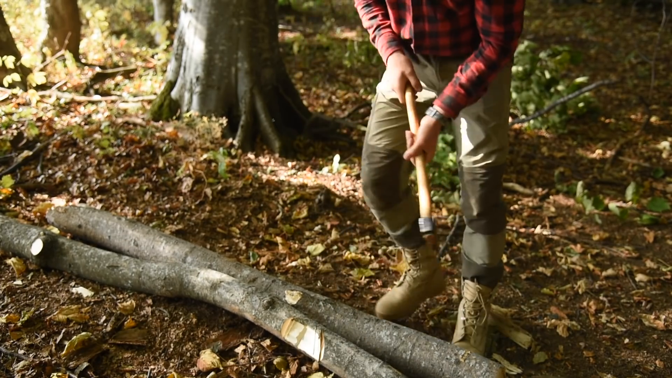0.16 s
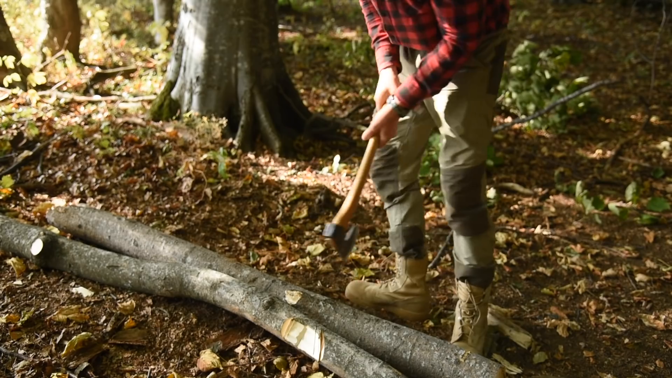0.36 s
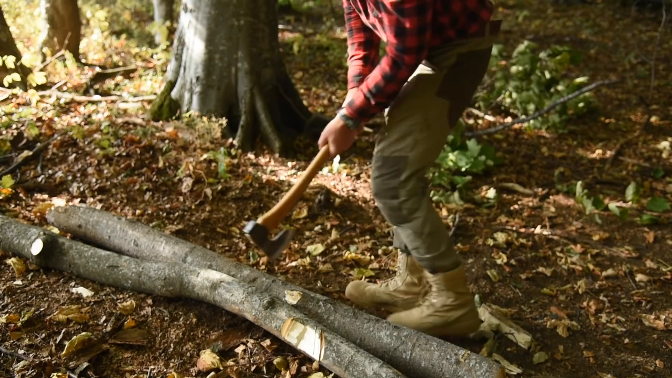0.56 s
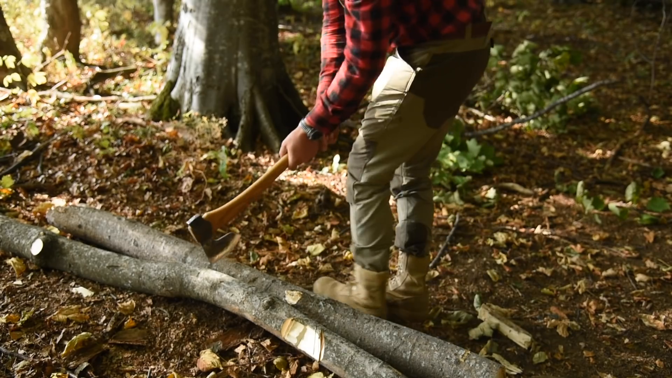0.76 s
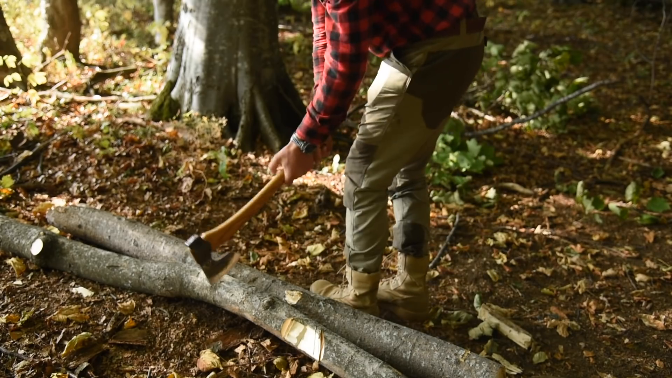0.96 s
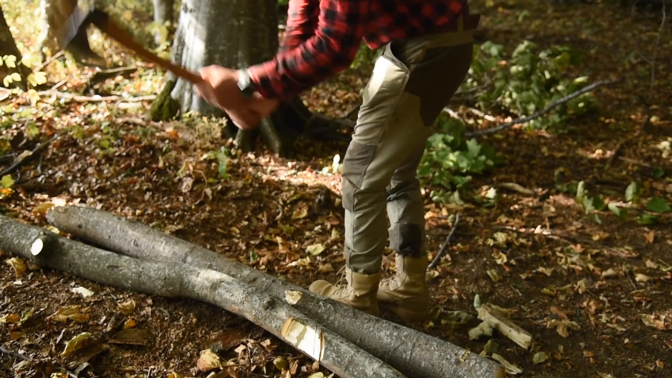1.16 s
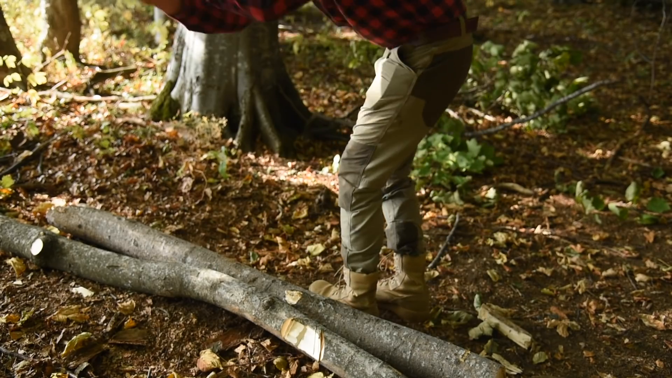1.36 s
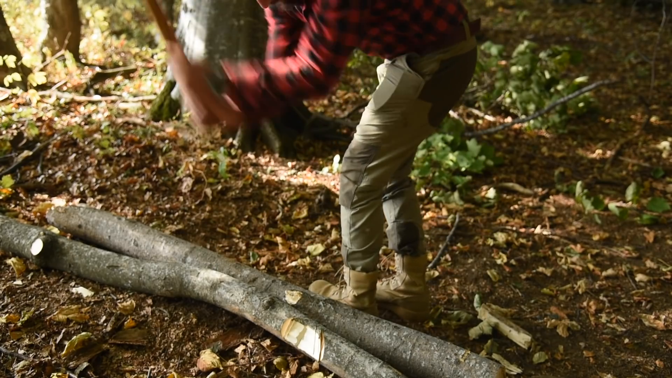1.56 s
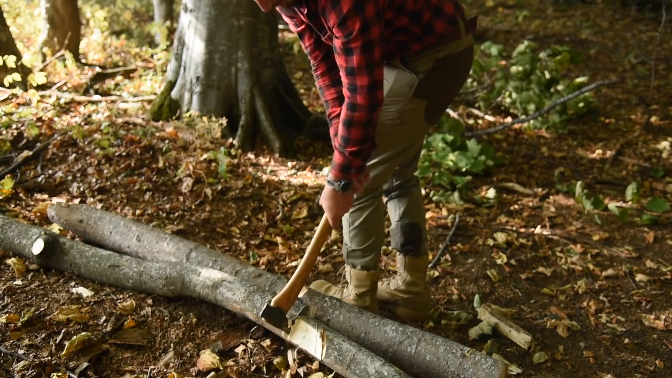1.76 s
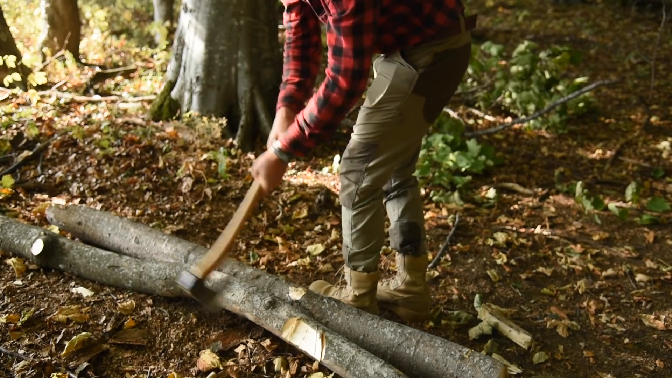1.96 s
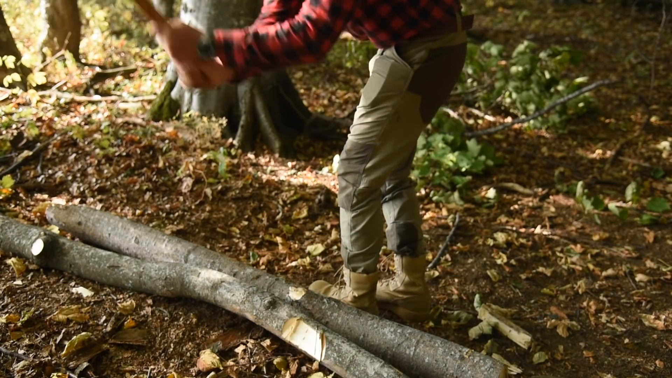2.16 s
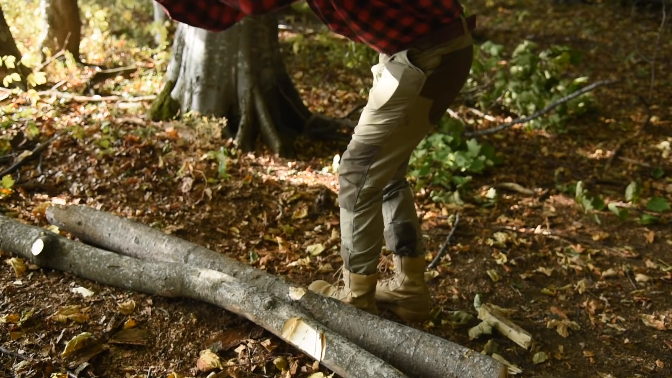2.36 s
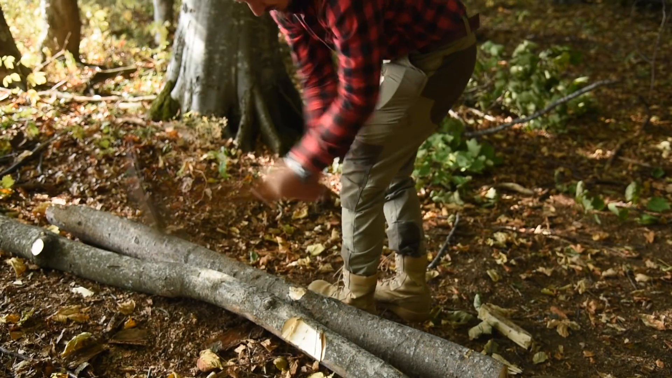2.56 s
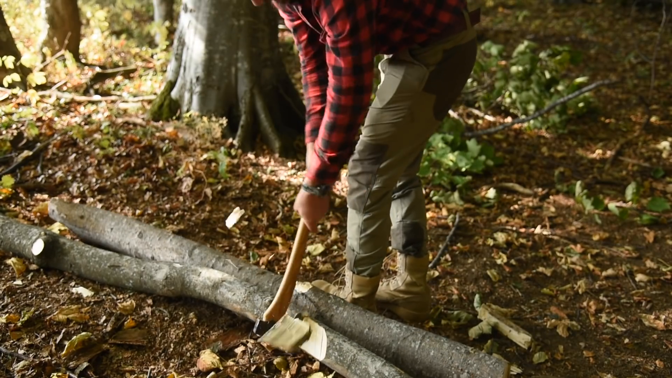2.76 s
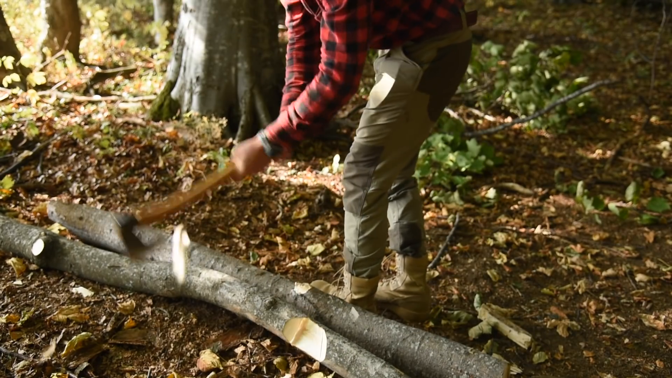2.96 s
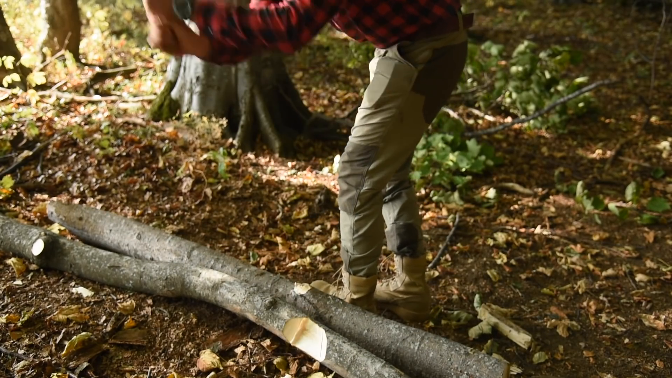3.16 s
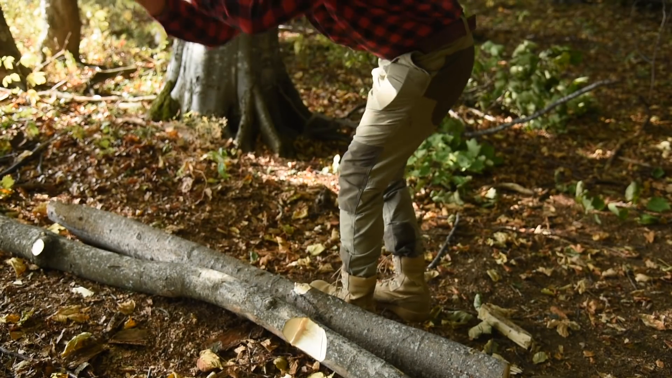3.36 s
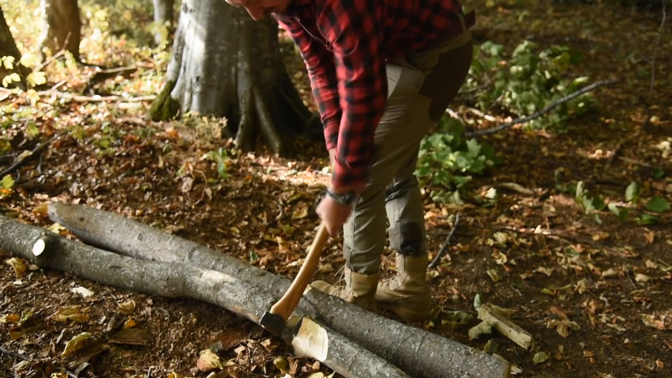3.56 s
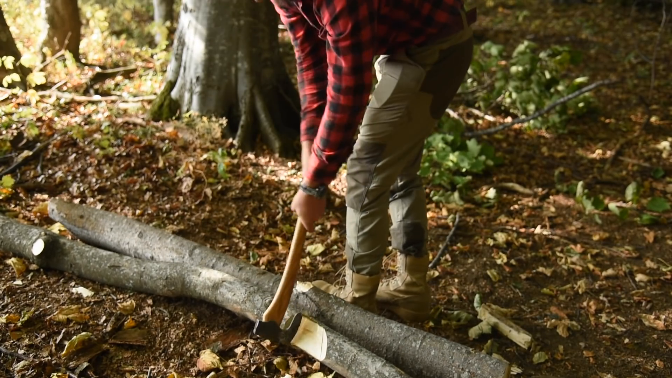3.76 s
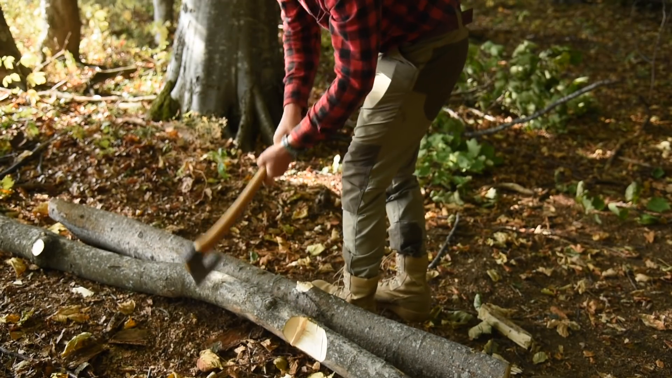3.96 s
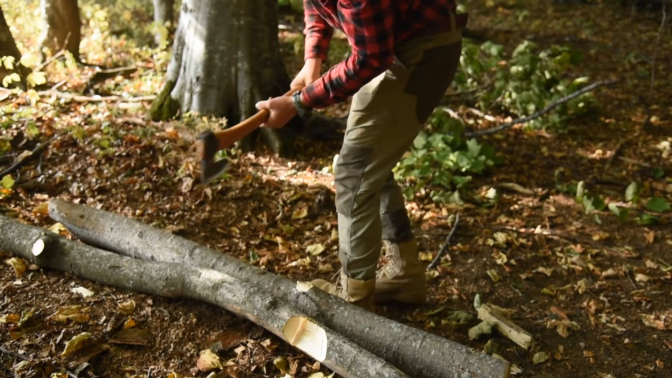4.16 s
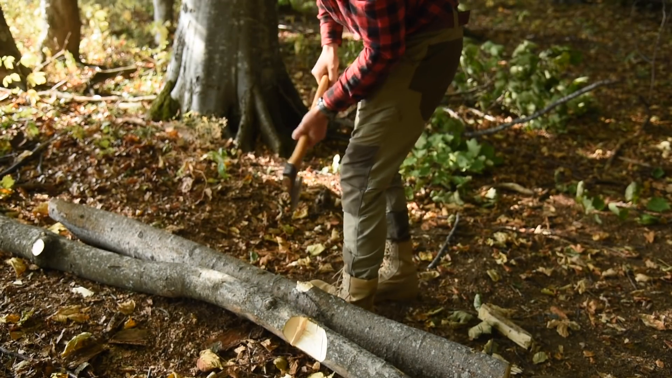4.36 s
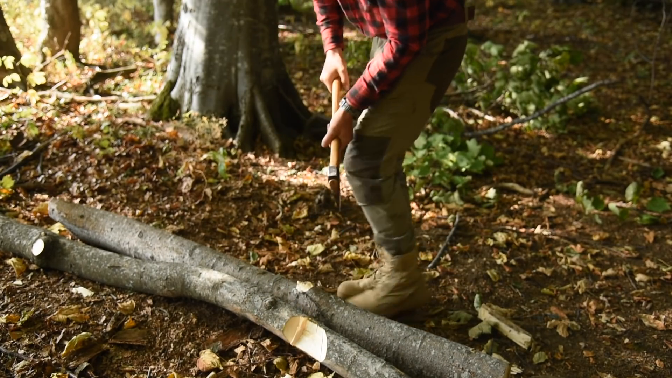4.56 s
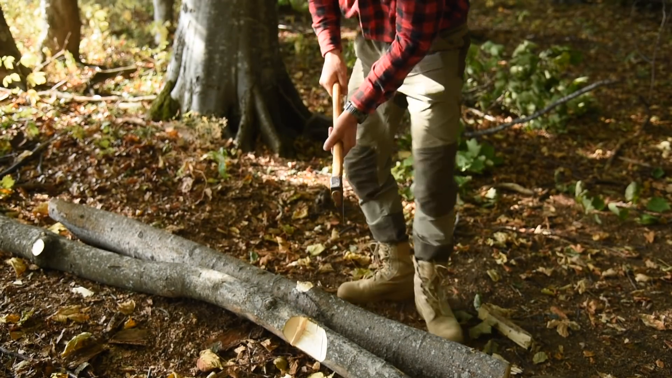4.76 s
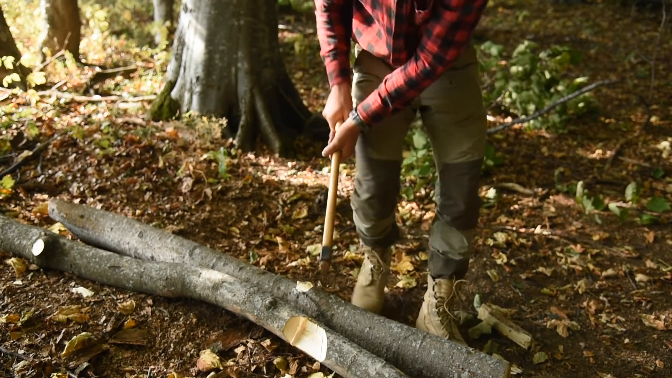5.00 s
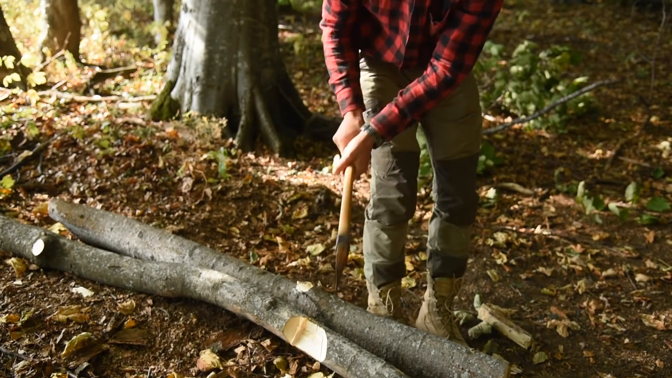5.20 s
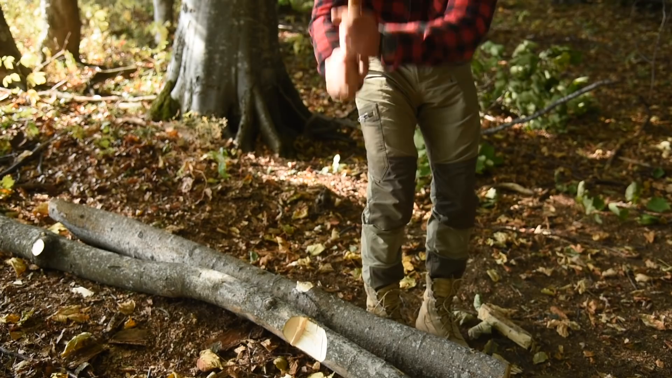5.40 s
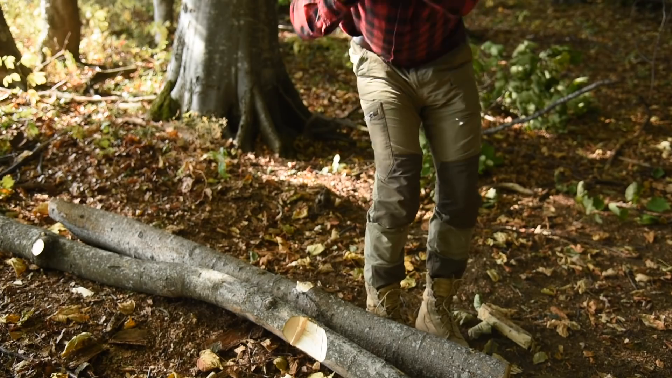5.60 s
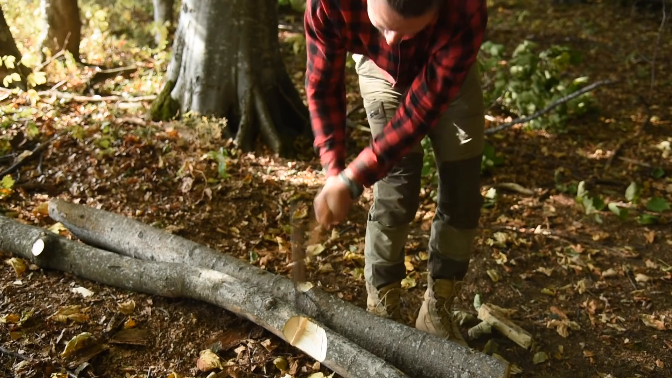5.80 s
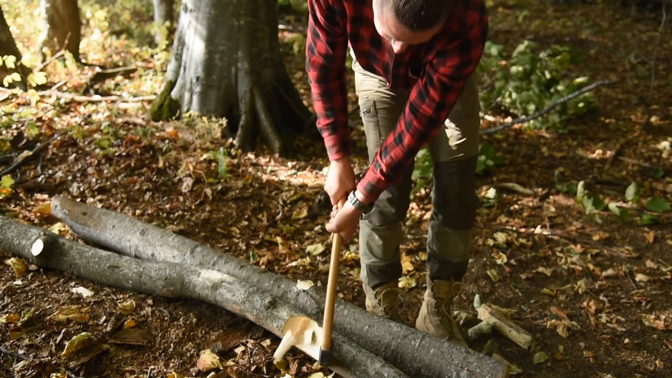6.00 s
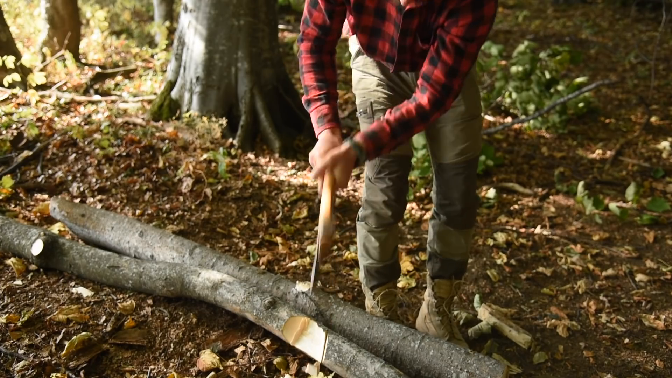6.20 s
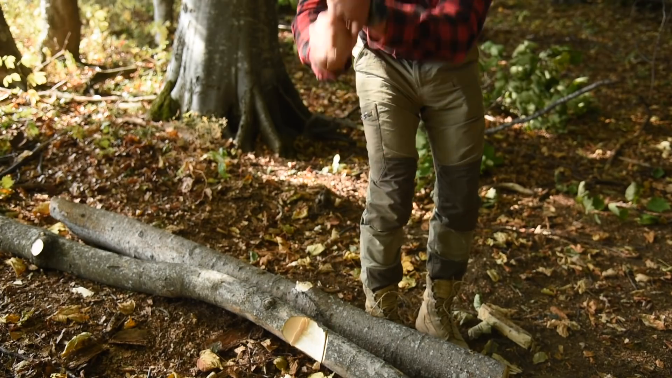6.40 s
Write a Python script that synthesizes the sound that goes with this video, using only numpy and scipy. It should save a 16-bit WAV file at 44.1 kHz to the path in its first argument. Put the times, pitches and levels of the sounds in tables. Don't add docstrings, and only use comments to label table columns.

```python
import sys
import numpy as np
from scipy import signal
from scipy.fft import rfft, irfft, next_fast_len
from scipy.io import wavfile
from scipy.ndimage import uniform_filter1d, minimum_filter1d, map_coordinates

SR = 44100
rng = np.random.default_rng(int(sys.argv[2]) if len(sys.argv) > 2 else 0)


def invert_db(x):
    u = np.asarray(x, float) / 20
    return 10 ** u


def wav_out(sig):
    wavfile.write(sys.argv[1], SR, np.round(np.clip(np.atleast_2d(sig).T, -1, 1) * 32767).astype(np.int16))


N = 284004

# f/Hz, density/dB
CANOPY_COLOUR = [(12, -32), (20, 22.5), (70, 0.5), (141, -2), (172, -4), (203, 0), (419, -6), (524, -4),
                 (1110, -6.5), (1890, -14.5), (2060, -22.5), (2570, -14), (4890, -19), (7860, -16),
                 (15800, -31.5)]
# t/s, rustle level/dB
BOOT_ACTIVITY = [(0, -47.5), (.14, -53.5), (.84, -55.5), (.95, -51), (1.09, -58.5), (1.47, -59), (2.6, -60),
                 (3.3, -49.5), (3.6, -57), (4.21, -48.5), (4.41, -53), (4.64, -56.5), (4.9, -47),
                 (5.11, -48), (5.24, -46.5), (5.36, -54.5), (5.8, -54), (6.44, -53)]
DEBRIS_DB = [-37, -35.5, -39.5, -36.5]
# t/s, level/dB, pitch f/Hz, t60/s
KNOCKS = [(.005, -39, 403, 0.08), (0.45, -26, 138, 0.06), (.829, -30, 420, .05), (.842, -29, 330, .04),
          (.859, -30, 250, .03), (.8745, -10.5, 350, .025), (.882, -25.5, 150, .07),
          (0.966, -44.5, 800, .02), (1.066, -38, 950, .02), (1.057, -32, 950, .025),
          (1.051, -44, 2600, 0.012), (1.0518, -31, 400, .025), (.8755, -20, 720, .02),
          (1.908, -25, 130, 0.18), (2.872, -24.5, 150, 0.21), (2.878, -25, 160, 0.155),
          (1.925, -30.5, 180, 0.093), (3.825, -23.5, 180, .1), (3.122, -25.5, 370, .04),
          (3.45, -35.5, 370, .05), (0.0061, -30, 230, .04), (3.77, -17, 270, 0.11),
          (4.355, -33.5, 300, 0.035), (4.383, -36, 330, .05), (4.947, -28, 200, .03), (5.9, -38, 394, .04),
          (4.996, -36, 250, .03), (4.52, -43, 230, 0.074), (4.687, -31.5, 460, .03),
          (4.688, -33.5, 210, 0.043), (4.778, -31, 205, 0.034), (4.939, -32, 530, 0.039),
          (2.74, -34, 210, 0.1), (5.28, -40, 127, 0.051), (6.13, -25, 330, 0.11), (6.125, -28, 650, 0.069)]
# t/s, peak level/dB, low f/Hz, high f/Hz
TAPS = [(.0055, -19, 300, 2980), (.0258, -22.5, 2200, 3940), (0.8748, -10, 700, 3580),
        (.968, -35.5, 700, 1600), (1.0512, -26, 2325, 2980), (1.542, -41, 2000, 3400),
        (1.9314, -15.5, 1550, 2570), (2.264, -29, 1200, 2000), (2.3044, -19.5, 1500, 5000),
        (2.3432, -24.5, 2500, 12000), (3.0028, -12.5, 3000, 4500), (3.0175, -11, 2230, 3220),
        (3.137, -14, 1300, 2200), (3.3582, -19, 400, 2800), (3.418, -38, 2410, 3100),
        (3.753, -8, 298, 5000), (3.7595, -11, 3290, 4200), (3.656, -5.5, 5000, 9000),
        (3.671, -3.5, 4530, 10000), (1.0516, -20, 650, 1400), (4.75, -40, 500, 900),
        (5.158, -32, 1000, 3000), (5.176, -38, 1500, 2600), (4.0083, -13.5, 700, 4000),
        (4.1625, -14, 4540, 7460), (4.591, -29, 300, 13000), (.347, -34, 600, 5000),
        (4.733, -33, 2500, 9000), (4.946, -26, 2500, 9000), (5.428, -37, 400, 1800),
        (5.316, -36, 1000, 2200), (5.9147, 4, 200, 1500), (.8752, -10.5, 250, 740), (2.676, 2.5, 500, 6000),
        (.1955, -36, 500, 1200), (.206, -38, 2500, 4500), (.3945, -25, 2000, 12000),
        (.416, -25.5, 600, 1500), (.771, -35.5, 803, 5000), (5.222, -23.5, 300, 1300),
        (5.237, -19, 300, 1300), (5.254, -19, 301, 1800), (5.995, -11, 890, 2000),
        (6.025, -10.5, 1530, 1950), (6.2165, -25, 2800, 5500), (6.271, -18.5, 1200, 3300),
        (4.186, -22, 2400, 3200), (4.937, -26, 700, 1500), (1.742, -5, 3000, 6000), (1.758, -8, 4500, 6000)]
# f/Hz, t60/s
TREE_T60 = [(60, .7), (200, 0.11), (600, 1), (2000, 0.79), (5000, 0.93), (12000, 0.42)]
# t/s, peak level/dB, pitch f/Hz
CLACKS = [
    (0.027, -36, 2800),
    (.195, -38.5, 790),
    (2.2332, -28.5, 1930),
    (2.7265, -9, 1060),
    (3.3495, -26, 4840),
    (3.7585, -9, 3680),
    (4.592, -34.5, 1510),
    (6.097, -15, 1790),
]
# t/s, peak level/dB, pitch f/Hz, t60/s
LEAF_STEPS = [(0.346, -31, 1120, 0.19), (.395, -32, 3200, 0.083), (0.406, -27, 2400, 0.28),
              (0.471, -30, 1060, 0.27), (0.5062, -17, 5230, 0.048), (.558, -32, 4300, 0.19),
              (0.7118, -30.5, 2030, 0.031), (0.7711, -27.5, 1470, 0.046), (1.239, -39, 3810, 0.062),
              (4.3528, -28.5, 1230, 0.1), (4.641, -34, 3500, 0.089), (4.6897, -30, 1070, 0.11),
              (4.9455, -20.5, 1550, 0.031), (4.907, -28, 1120, 0.2), (5.158, -34, 1110, .069),
              (5.303, -30, 2410, 0.031)]
# f/Hz, density/dB
LEAF_COLOUR = [(590, -23), (1000, -2.5), (1710, -3.5), (2010, -5), (3700, -2.5), (4190, -2), (5460, -3.5),
               (6340, -5), (9910, -7.5), (15500, -20)]
# t/s, length/s, level/dB, pitch f/Hz, thud level/dB
SCUFFS = [(0.384, 0.053, -36, 5600, -43), (0.45, 0.11, -42.5, 5020, -45), (0.806, 0.078, -40.5, 1500, -46),
          (4.197, 0.049, -38.5, 7950, -60), (4.49, .06, -47.5, 900, -48), (0.456, .05, -41, 1200, -57),
          (4.328, 0.11, -46.5, 5970, -43.5), (4.614, 0.11, -45, 9050, -56), (4.875, 0.13, -47.5, 4840, -45),
          (4.89, .07, -38.5, 1100, -50), (4.964, 0.085, -41, 7960, -42), (5.196, 0.044, -27.5, 600, -38),
          (5.222, 0.053, -26, 506, -33), (5.184, .085, -48, 3000, -40), (3.11, 0.054, -28.5, 3050, -35.5),
          (6.294, .14, -55, 3000, -69)]
# t/s, peak level/dB, pitch f/Hz
TWIG_TICKS = [(.3936, -25, 3220), (.604, -38.5, 7700), (.633, -38.5, 8000), (4.093, -27, 3100),
              (4.38, -46, 7700), (4.39, -36, 6100), (4.4334, -40, 5000), (4.674, -44, 5000),
              (4.736, -33, 4030), (4.995, -25, 4100), (5.034, -31, 4500), (5.05, -33, 4800),
              (5.175, -36, 2000), (5.312, -33, 2410), (5.326, -35, 3270), (5.365, -31.5, 2430),
              (5.43, -49.5, 1400), (5.812, -39.5, 3420), (6.375, -31, 9000), (6.408, -33.5, 9600)]
# t/s, edge level/dB, edge pitch f/Hz, crush level/dB, splinter level/dB
BLOWS = [
    (1.7261, 18, 3500, 7.5, -15.5),
    (2.676, 17.5, 1500, 7.5, -10),
    (3.6381, 17.5, 5770, 5.5, -13.5),
    (5.9148, 20.5, 4880, 5.5, -9.5),
]
# first contact t/s after blow, loss/dB, rest t/s after blow
SETTLE = [
    (0.05, 5, 0.23),
    (0.09, 3.5, 0.32),
    (0.077, 5.5, 0.24),
    (0.064, -3, 0.23),
]
# f/Hz, density/dB
EDGE_COLOUR = [(180, -35.5), (300, -12), (1440, -3), (2040, -16.5), (3630, -10), (5300, -13), (6050, -18.5),
               (7500, -15.5), (15500, -33.5)]
# f/Hz, density/dB
CRUSH_COLOURS = [
    [(47, -41), (150, -22), (338, -11), (801, -6.5), (874, -6.5), (1040, -15), (2500, -13), (3250, -62),
     (5500, -120)],
    [(47, -43), (150, -15.5), (505, -5.5), (592, 3.5), (725, -11), (874, -1), (2500, -18), (3250, -59.5),
     (5500, -120)],
    [(47, -30), (150, -16), (592, -6.5), (899, -11), (966, -10), (1070, -6.5), (2500, -16), (3250, -61.5),
     (5500, -120)],
    [(47, -43), (150, -17), (319, -4.5), (477, -8), (610, -2.5), (1220, -8.5), (2500, -5.5), (3250, -56.5),
     (5500, -120)],
]
# f/Hz, t60/s
CRUSH_T60 = [(60, 0.24), (200, 0.31), (500, 0.25), (1200, 0.14), (2500, 0.048)]
# f/Hz, density/dB
SPLINTER_COLOURS = [
    [(880, -37.5), (1500, -22), (2400, -7), (2590, -11.5), (2800, -9.5), (4800, -5), (11600, -28),
     (15500, -39.5)],
    [(880, -9.5), (1500, -1), (1720, -5), (2050, -11), (2330, -6), (2920, -15.5), (4800, -12), (15500, -39)],
    [(900, -23), (1500, -2), (2200, -10), (4150, -7.5), (4500, 10.5), (5600, 14), (6000, 5.5), (7600, 7.5),
     (9500, 1.5), (15500, -23.5)],
    [(880, -36), (1500, -23.5), (1990, -11.5), (2540, 0.5), (3310, -8.5), (3580, -8.5), (7450, -8.5),
     (15500, -47)],
]
# f/Hz, level/dB, t60/s
LOG_MODES = [
    [(120.6, -13.5, 1), (213.7, -4, 0.26), (264.6, -5, 0.3), (339.2, -3, 0.26), (429.5, -7.5, .15),
     (539, -3.5, 0.21), (605, -1, 0.11), (733, -14, 0.2)],
    [(127.7, -14.5, 0.75), (150.4, -9, 0.3), (206.4, -5, 0.35), (246, -7, 0.13), (325, 0, 0.27),
     (379.4, 5, 0.15), (543.6, 1, 0.14), (708, -6.5, 0.17)],
    [(116.2, -8.5, 0.67), (202.4, -1, 0.29), (268.8, 0, 0.24), (313.8, 2, 0.23), (386, -8, .2),
     (542, -6.5, 0.22), (600, -4.5, 0.22), (739, -13, 0.31)],
    [(124.5, -17, 0.69), (210, -3, 0.29), (264, -10, 0.28), (311.5, -4.5, .36), (429, -8.5, 0.22),
     (553.5, -7.5, 0.25), (604, -3.5, 0.19), (700, -9, 0.26)],
]
# f/Hz, level/dB, t60/s
GIRTH_MODES = [
    [(609, 0.5, 0.071), (715, -1.5, .07), (876.4, 3, 0.093), (1120, -12, .15), (1302, 8.5, 0.065),
     (1453, 7, 0.029), (1667, 6, 0.04)],
    [(615, -0.5, 0.15), (702, 0, .1), (890, 3.5, 0.068), (1205, -9, 0.16), (1326, -7, 0.14),
     (1500, 15, 0.033), (1638, 9, 0.052)],
    [(344.5, 1.5, 0.2), (475.3, -2.5, .2), (885, 2.5, .12), (1052, -5, 0.1), (1252, 5.5, 0.049),
     (1402, -3.5, .09), (1600, -11, 0.11)],
    [(147.2, -7, 0.33), (605, 8, 0.1), (830, 9.5, 0.056), (935, -0.5, .13), (1117, -7.5, 0.17),
     (1329, 4, 0.059), (1484, 6, .05)],
]
# t/s, peak level/dB, pitch f/Hz, t60/s
CHIPS = [(1.9902, -8.5, 1740, 0.097), (1.9937, -4, 3550, 0.078), (2.0127, -8.5, 2800, 0.067),
         (2.0896, -22.5, 900, 0.13), (2.2146, -23, 2860, 0.14), (2.269, -13.5, 6560, 0.061),
         (2.4206, -32, 1170, 0.14), (2.5646, -39, 7000, 0.049), (3.0008, -9.5, 1120, 0.069),
         (3.0172, -9.5, 2700, 0.064), (3.0348, -20, 1370, 0.24), (3.1203, -7, 2250, 0.11),
         (3.2738, -26.5, 1981, 0.17), (3.2979, -25, 1880, 0.15), (3.3571, -21.5, 1110, 0.097),
         (3.4487, -12, 3770, 0.07), (3.455, -13, 3500, 0.053), (3.465, -20, 1290, 0.14),
         (3.136, -14, 900, 0.063), (3.372, -27, 2600, 0.065), (3.8432, -12.5, 5270, 0.015),
         (4.006, -16, 2510, 0.16), (4.012, -15.5, 8520, .1), (4.1612, -14.5, 1560, 0.096),
         (4.174, -13.5, 2770, 0.13), (4.2153, -26.5, 1174, 0.17), (6.0725, -7, 3300, 0.11),
         (6.0879, -6.5, 2520, 0.066), (6.216, -22, 3000, 0.039), (6.27, -13, 2720, 0.079),
         (6.345, -26, 990, 0.11)]
# t/s, length/s, level/dB, start f/Hz, end f/Hz
SQUEAK = (5, 0.12, -51, 1800, 3201)
# f/Hz, gain/dB
MIC_RESPONSE = [(20, -23), (60, -0.5), (5300, -0.5), (6200, -4), (7200, 0.5), (15000, 1)]


def unit(x):
    return x / np.sqrt(np.mean(x ** 2) + 1e-20)


def along(points, hz):
    f, v = np.transpose(points)
    return np.interp(np.log(hz + 1), np.log(f + 1), v)


def gain(points):
    return lambda hz: invert_db(along(points, hz))


def band(lo_hz, hi_hz):
    return lambda hz: 1 / np.sqrt((1 + (lo_hz / (hz + 1)) ** 4) * (1 + (hz / hi_hz) ** 4))


def filtered(x, response):
    m = 2 * next_fast_len(len(x) // 2 + 4096)
    return irfft(rfft(x, m) * response(np.fft.rfftfreq(m, 1 / SR)), m)[:len(x)]


def causal(response):
    def turned(hz):
        c = irfft(np.log(response(hz)))
        half = len(c) // 2 - 1
        c = c * np.r_[1, np.full(half, 2), 1, np.zeros(half)]
        return np.exp(rfft(c))
    return turned


def noise(size, response):
    return unit(filtered(rng.standard_normal(size), response))


def crackle(size, per_s, spread_db):
    when, sign, height = rng.random((3, size))
    snaps = (when < per_s / SR) * np.sign(sign - .5) * invert_db(-spread_db * np.log(height + .02))
    return unit(unit(snaps) + 0.4 * rng.standard_normal(size))


def dying(size, colour, t60s, rise_cycles):
    hz, t, z = signal.stft(noise(size, colour), SR, nperseg=256)
    decay = invert_db(-60 * t / along(t60s, hz)[:, None])
    rise = 1 - np.exp(-(t + 0.0012) * (hz[:, None] + 40) / rise_cycles)
    return signal.istft(z * decay * rise, SR, nperseg=256)[1][:size]


def wobble(size, rate):
    at = np.arange(0, size + 32, 32)
    knots = rng.standard_normal(int(size * rate / SR) + 4)
    return np.interp(np.arange(size), at, map_coordinates(knots, [at * rate / SR]))


def add(track, s, x):
    track[round(s * SR):][:len(x)] += x


def canopy():
    return invert_db(-48 - 0.5 + 1.3 * wobble(N, rate=7.4)) * noise(N, gain(CANOPY_COLOUR))


def shuffle():
    t = np.arange(N) / SR
    since = t - np.array(BLOWS)[:, :1]
    late = since - 0.14
    rise_db_per_s, fall_db_per_s = 166, 39.5
    slope_db = np.where(late < 0, rise_db_per_s * late, -fall_db_per_s * late)
    debris = invert_db(np.array(DEBRIS_DB)[:, None] + slope_db)
    patter = crackle(N, per_s=1200, spread_db=3)
    crumbs = [unit(filtered(patter, gain(colour))) for colour in SPLINTER_COLOURS]
    crumbs = (debris * crumbs).sum(axis=0)
    debris = debris.sum(axis=0)
    boots = invert_db(np.interp(t, *np.transpose(BOOT_ACTIVITY)))
    lean_db, lean_db_per_s = -56, 213
    lean = (invert_db(lean_db + lean_db_per_s * np.minimum(since, 0)) * (since < 0)).sum(axis=0)
    crunch = unit(filtered(crackle(N, per_s=1500, spread_db=2), band(1100, 3470)))
    fizz = unit(filtered(crackle(N, per_s=2500, spread_db=3), band(7000, 12000)))
    weight = unit(filtered(crackle(N, per_s=400, spread_db=0), band(260, 1280)))
    crunch = (boots + invert_db(-12.5) * debris) * crunch
    fizz = (invert_db(-10.5) * boots + invert_db(-20) * debris + invert_db(-68.0)) * fizz
    weight = (invert_db(-2.0) * boots + invert_db(-4.5) * debris + lean) * weight
    return crumbs + crunch + fizz + weight


def knocks():
    out, t = np.zeros(N + SR), np.arange(SR // 4) / SR
    for s, db, hz, t60_s in KNOCKS:
        puff = noise(len(t), band(hz / 1.3, hz * 0.99))
        note = np.sin(2 * np.pi * hz * t) + .5 * np.sin(2 * np.pi * 1.9 * hz * t)
        rise = 1 - np.exp(-t * hz / 0.35)
        add(out, s, invert_db(db - 60 * t / t60_s) * (note + 0.84 * puff) * rise)
    return out[:N]


def taps():
    out, t = np.zeros(N + SR), np.arange(SR // 10) / SR
    push_s, grit_t60_s = .00015, .015
    for s, db, lo_hz, hi_hz in TAPS:
        push = (1 - t / push_s) * np.exp(-t / push_s)
        push = push + .1 * invert_db(-60 * t / grit_t60_s) * rng.standard_normal(len(t))
        sos = signal.butter(3, [lo_hz, hi_hz], "band", fs=SR, output="sos")
        click = signal.sosfilt(sos, push)
        add(out, s, invert_db(db) * click / np.abs(click).max())
    return out[:N]


def evened(x, fine_size, broad_size, from_hz):
    power, hz = np.abs(rfft(x)) ** 2 + 1e-9, np.fft.rfftfreq(len(x), 1 / SR)
    ratio = uniform_filter1d(power, broad_size) / uniform_filter1d(power, fine_size)
    level = np.clip(np.sqrt(np.abs(ratio)), .1, 10) ** (hz ** 2 / (hz ** 2 + from_hz ** 2))
    return filtered(x, causal(lambda f: np.interp(f, hz, level)))


def trees(x, wet_db):
    out = np.zeros(N + 3 * SR)
    for start in range(0, N, SR):
        tail = dying(SR * 3 // 2, band(60, 11000), TREE_T60, rise_cycles=0.9)
        source = evened(x[start:start + SR], fine_size=50, broad_size=700, from_hz=500)
        add(out, start / SR + .012, signal.fftconvolve(source, tail / np.linalg.norm(tail)))
    return invert_db(wet_db) * out[:N]


def landing(db, hz, t60_s, snap_db, weight_db):
    t = np.arange(SR // 6) / SR
    leaves = lambda f: gain(LEAF_COLOUR)(f) * (.5 + band(hz / 1.4, hz * 1.4)(f))
    crunch = unit(filtered(crackle(len(t), per_s=2500, spread_db=3), leaves))
    note_cycles = 33
    note = np.sin(2 * np.pi * hz * t) * invert_db(-60 * t * np.sqrt(hz * 1400) / note_cycles)
    snap = note + .5 * crunch * invert_db(-60 * t / 0.007)
    weight = noise(len(t), band(380, 1000))
    fade = invert_db(-60 * t / t60_s) * (1 - np.exp(-t / 0.00067))
    return invert_db(db) * (invert_db(snap_db) * snap + fade * (0.23 * crunch + invert_db(weight_db + 4.5) * weight))


def clacks():
    out = np.zeros(N + SR)
    for s, db, hz in CLACKS:
        add(out, s, landing(db, hz, t60_s=0.045, snap_db=-2.5, weight_db=-11.5))
    return out[:N]


def leaf_steps():
    out = np.zeros(N + SR)
    for s, db, hz, t60_s in LEAF_STEPS:
        add(out, s, landing(db, hz, t60_s, snap_db=-9.5, weight_db=-20))
    return out[:N]


def scuffs():
    out = np.zeros(N + SR)
    for s, length_s, db, hz, thud_db in SCUFFS:
        size = round(length_s * SR)
        rasp = unit(filtered(crackle(size, per_s=1500, spread_db=3.5), band(hz / 3, hz * 1.5)))
        thud = noise(size, band(71, 284))
        add(out, s, np.hanning(size) * (invert_db(db) * rasp + invert_db(thud_db) * thud))
    return out[:N]


def twig_ticks():
    out = np.zeros(N + SR)
    for s, db, hz in TWIG_TICKS:
        add(out, s, landing(db, hz, t60_s=0.035, snap_db=-4.5, weight_db=-32))
    return out[:N]


def swish():
    t = np.arange(SR // 10) / SR
    return noise(len(t), band(100, 700)) * invert_db(-41.0 - 230 * t[::-1])


def edge_crack(t, db, hz):
    bite = lambda f: gain(EDGE_COLOUR)(f) * (2.2 + band(hz / 1.2, hz * 1.2)(f))
    hold_s, t60_s = .004, 0.0073
    return noise(len(t), bite) * invert_db(db - 4 - 60 * np.maximum(t - hold_s, 0) / t60_s)


def splinter_hiss(t, db, colour):
    hiss = unit(filtered(crackle(len(t), per_s=2500, spread_db=2.5), gain(colour)))
    return hiss * invert_db(db - 60 * t / 0.38 + 1.0 * wobble(len(t), rate=61))


def damped(modes, t, rock_db):
    ring, t = np.zeros(len(t)), t[:SR // 2]
    for hz, db, t60_s in modes:
        build = (1 - np.exp(-t * hz / 3.0)) ** 2
        rock = rock_db * min(hz / 400, 1.5) * wobble(len(t), rate=31.5)
        drift = hz / 4000 * wobble(len(t), rate=70)
        tone = np.sin(2 * np.pi * (hz * t + drift + rng.random()))
        ring[:len(t)] += invert_db(db + rock - 60 * t / t60_s) * build * tone
    return ring


def soil_thump(t):
    boom = invert_db(-23.5 - 60 * t / 0.89) * noise(len(t), band(62, 88)) * (1 - np.exp(-t / 0.03))
    push_s = .008
    return boom + invert_db(-25) * t / push_s * (2 - t / push_s) * np.exp(-t / push_s)


def axe():
    out, t = np.zeros(N + 2 * SR), np.arange(SR) / SR
    rows = zip(BLOWS, SETTLE, CRUSH_COLOURS, SPLINTER_COLOURS, LOG_MODES, GIRTH_MODES)
    for blow, settle, crush_colour, splinter_colour, modes, girth in rows:
        s, edge_db, edge_hz, crush_db, splinter_db = blow
        touch_s, lost_db, rest_s = settle
        add(out, s - .1, swish())
        edge = edge_crack(t, edge_db, edge_hz)
        crush = invert_db(crush_db) * dying(SR, gain(crush_colour), CRUSH_T60, rise_cycles=3.6)
        ring = invert_db(3.0) * damped(modes, t, rock_db=2.5) + damped(girth, t, rock_db=4)
        muffle_db = lost_db * np.clip((t - touch_s) / 0.0082, 0, 1) + 300 * np.clip(t - rest_s, 0, .1)
        wood = (crush + ring) * invert_db(-muffle_db)
        add(out, s, edge + wood + splinter_hiss(t, splinter_db, splinter_colour) + soil_thump(t))
    return out[:N]


def chips():
    out = np.zeros(N + SR)
    for s, db, hz, t60_s in CHIPS:
        add(out, s, landing(db, hz, t60_s, snap_db=-10.5, weight_db=-25))
    return out[:N]


def squeak():
    s, length_s, db, from_hz, to_hz = SQUEAK
    out, t = np.zeros(N), np.arange(round(length_s * SR)) / SR
    hz = to_hz + (from_hz - to_hz) * np.exp(-t / 0.012)
    phase = 2 * np.pi * np.cumsum(hz) / SR
    swell = invert_db(db + 4.3 * wobble(len(t), rate=150)) * np.sqrt(np.hanning(len(t)))
    add(out, s, swell * (np.sin(phase) + .8 * np.sin(phase / 2.8)))
    return out


def scene():
    small = knocks() + taps() + clacks() + leaf_steps() + scuffs() + twig_ticks() + chips() + squeak()
    blows = axe()
    tail = trees(blows + invert_db(2.5) * small, wet_db=-27.5)
    return (canopy() + shuffle() + small + blows + tail)[None]


def top_cut(x):
    return signal.sosfilt(signal.butter(12, 15600, fs=SR, output="sos"), x)


def record(dry):
    x = filtered(dry[0], causal(gain(MIC_RESPONSE)))
    need = minimum_filter1d(np.minimum(1, 1.45 / (np.abs(x) + 1e-9)), size=61)
    x = x * uniform_filter1d(need, size=31)
    clipped = x / (1 + np.abs(x / 1.05) ** 6) ** (1 / 6)
    return top_cut(clipped[None])


dry = scene()
out = record(dry)
wav_out(out)
```